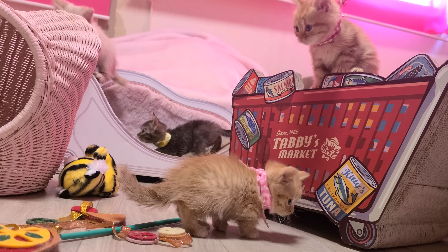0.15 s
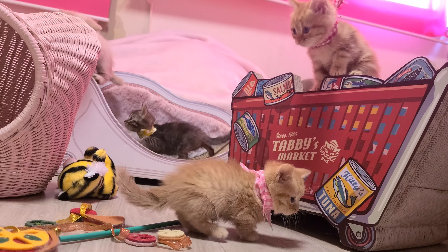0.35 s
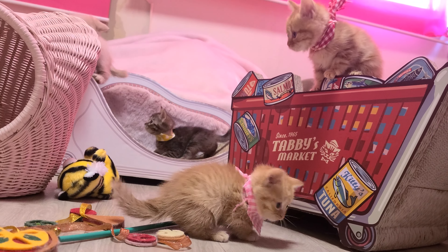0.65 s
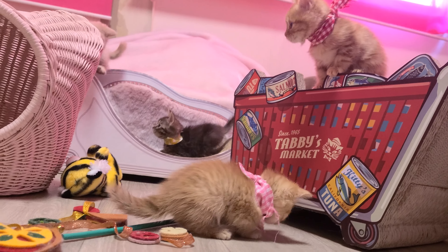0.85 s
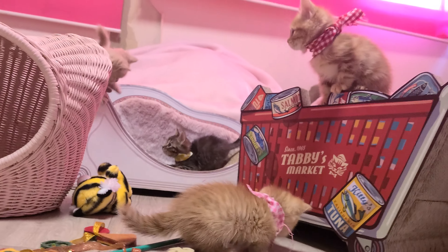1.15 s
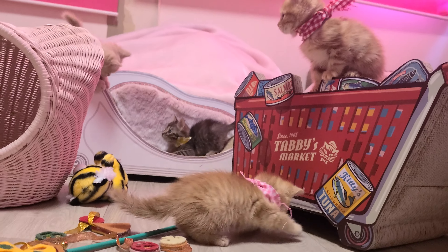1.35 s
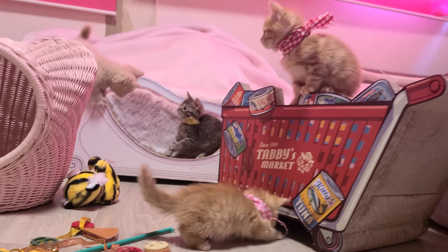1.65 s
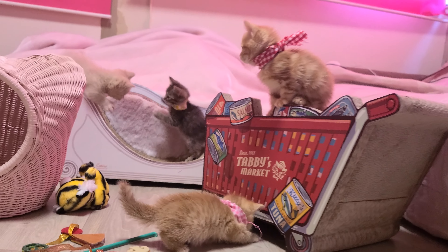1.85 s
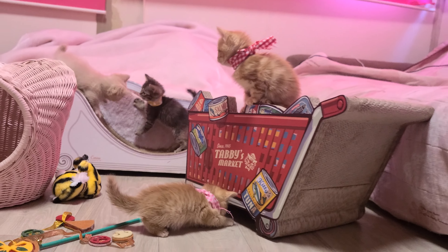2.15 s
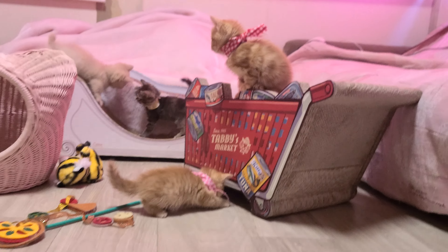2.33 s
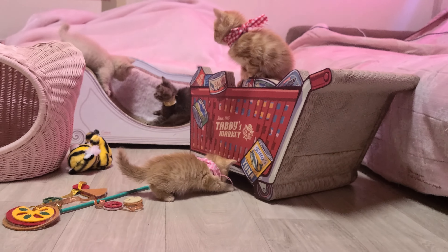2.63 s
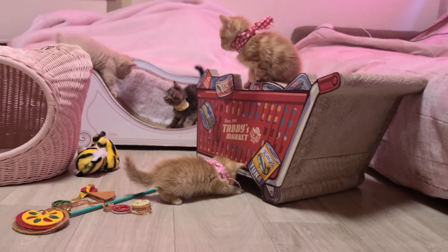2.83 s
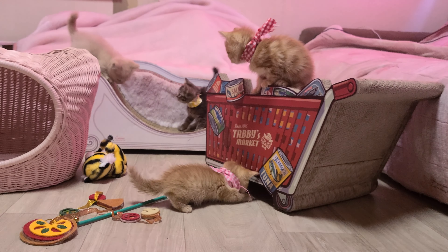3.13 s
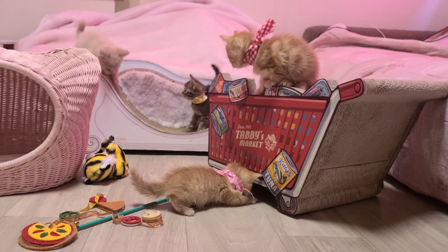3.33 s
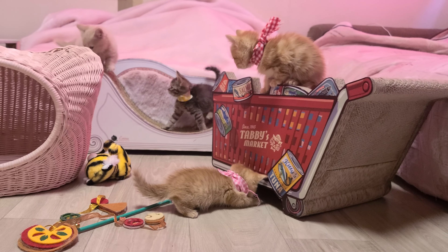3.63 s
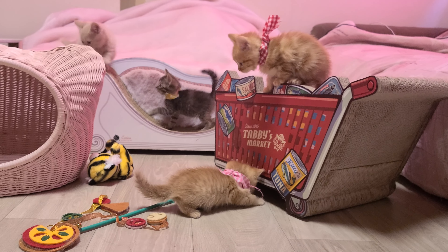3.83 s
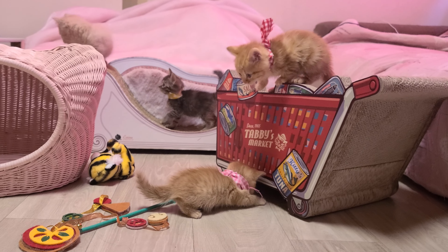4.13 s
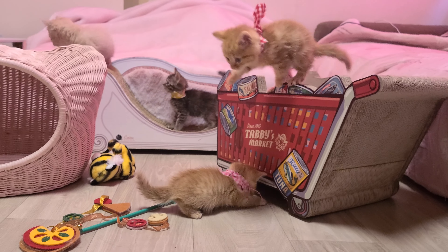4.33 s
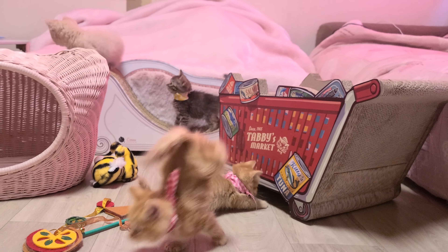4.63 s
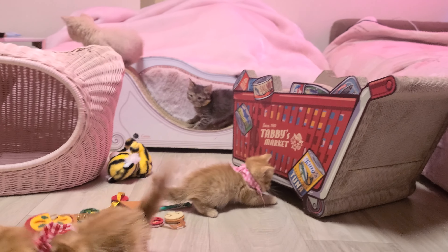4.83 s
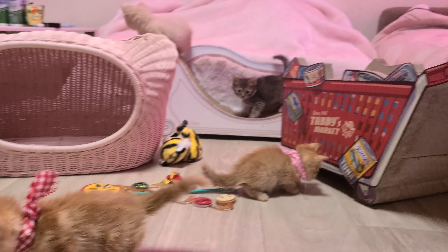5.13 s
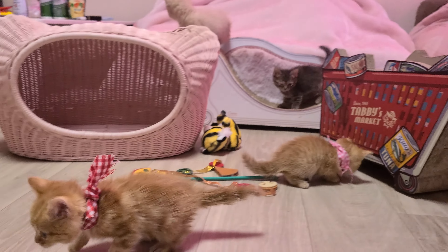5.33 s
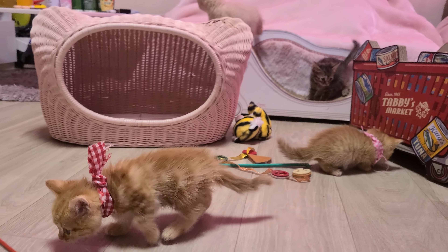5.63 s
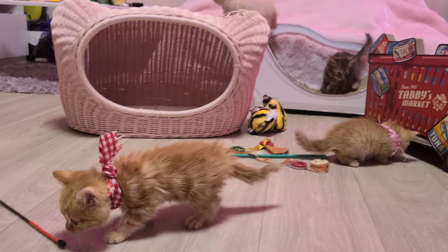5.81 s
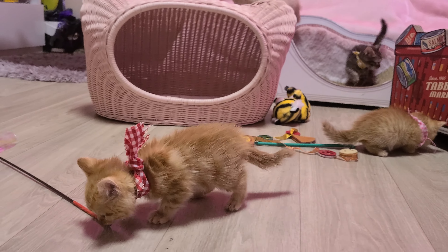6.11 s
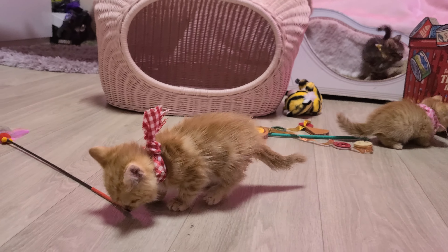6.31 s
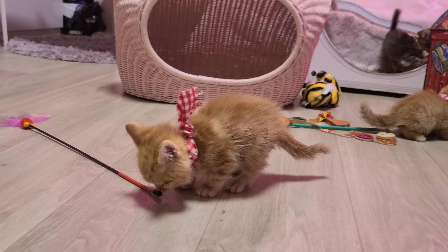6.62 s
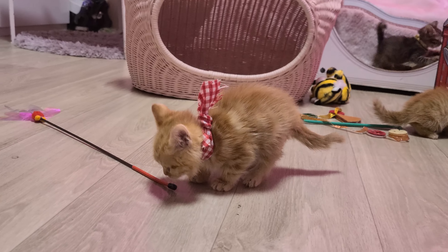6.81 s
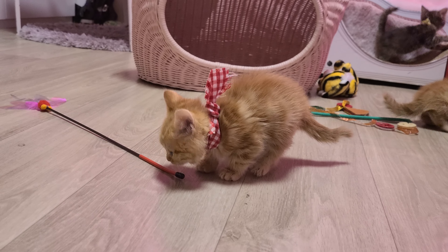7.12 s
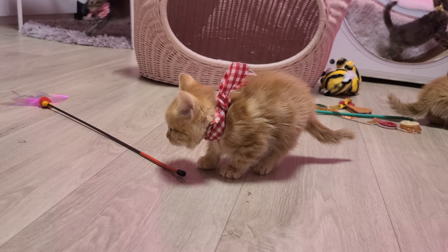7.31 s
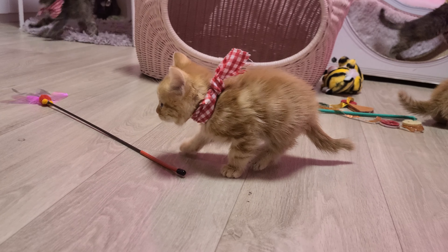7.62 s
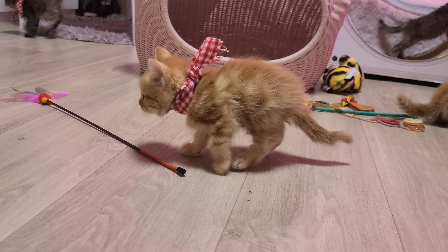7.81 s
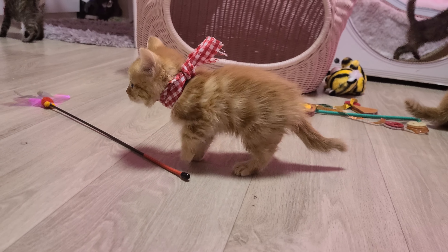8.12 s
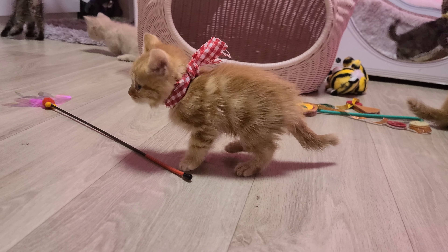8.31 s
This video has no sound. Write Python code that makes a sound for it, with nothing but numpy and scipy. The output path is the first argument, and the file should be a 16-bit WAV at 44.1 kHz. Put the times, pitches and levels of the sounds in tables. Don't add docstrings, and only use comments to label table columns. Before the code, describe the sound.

In a small furnished room a low fan hum runs throughout. Kittens' claws tick and scrape on cardboard and wicker, with faint fur rustles. Around the middle one leaps down with a soft double thud, a scuff and a tiny bell tinkle. Close finger taps pop on the right side of the handheld stereo microphone, strongest early and in a later cluster; small paw knocks end it.

```python
import sys
import numpy as np
from scipy import signal
from scipy.fft import rfft, irfft, next_fast_len
from scipy.io import wavfile
from scipy.ndimage import uniform_filter1d, map_coordinates

SR = 44100
rng = np.random.default_rng(int(sys.argv[2]) if len(sys.argv) > 2 else 0)


def pcm_store(signal):
    levels = np.round(np.clip(np.atleast_2d(signal), -1, 1) * 32767)
    wavfile.write(sys.argv[1], SR, levels.astype(np.int16).T)


def ratio(d):
    e = np.asarray(d, float) / 20
    return 10 ** e


N = 373086


def unit(x):
    return x / np.sqrt(np.mean(x ** 2) + 1e-20)


def along(points, hz):
    f, v = np.transpose(points)
    return np.interp(np.log(hz + 1), np.log(f + 1), v)


def wobble(rate):
    knots = rng.standard_normal(int(N * rate / SR) + 4)
    return map_coordinates(knots, [np.arange(N) * rate / SR])


def filtered(x, response):
    m = next_fast_len(N + SR // 2)
    return irfft(rfft(x, m) * response(np.fft.rfftfreq(m, 1 / SR)), m)[..., :N]


def resonance(centre_hz, width_hz):
    return lambda f: 1j * f * width_hz / (centre_hz ** 2 - f * f + 1j * f * width_hz)


def sides(pan_db):
    return ratio(np.array([pan_db / 2, -pan_db / 2]))


def add(track, s, sound):
    start = round(s * SR)
    track[..., start:start + sound.shape[-1]] += sound


def patchy(x, depth_db):
    z = signal.stft(x, nperseg=128)[2]
    field = uniform_filter1d(rng.standard_normal(z.shape[-2:]), size=3, axis=0)
    field = uniform_filter1d(field, size=5, axis=1)
    return signal.istft(z * unit(ratio(depth_db * unit(field))), nperseg=128)[1][..., :N]


# t/s, peak level/dB, contact/ms, port ring level/dB, vent f/Hz
FINGER_TAPS = [(1.0493, -39, 0.96, -35, 185), (1.0670, -36, 0.87, -35, 185),
               (1.0818, -35, 0.15, -26.3, 345), (1.495, -32, 0.13, -37.5, 345),
               (1.5013, -28, 0.5, -30, 300), (1.5035, -14, 0.13, 3, 420), (1.5035, -9.5, 0.4, -30, 400),
               (1.8762, -39.5, 0.85, -30, 300), (2.4432, -39, 0.44, -32.5, 300),
               (2.7124, -41, 0.1, -10, 500), (2.7129, -27, 0.7, -14, 270), (2.7270, -27.5, 0.45, -24, 290),
               (2.741, -24.5, 0.45, -16, 320), (2.7538, -27, 0.42, -21, 300),
               (3.2351, -45, 0.11, -26.3, 390), (3.2562, -11, 0.24, -21.5, 288),
               (6.0666, -6, 0.11, -9, 350), (6.2238, -31, 0.11, -30, 800), (6.2243, -5.5, 0.11, -15.5, 363),
               (6.3412, -5.5, 0.096, -11.5, 435), (6.8140, -34, 0.11, -30, 800),
               (6.8144, -5.5, 0.1, -8.5, 400), (6.9550, -34, 0.15, -30, 600),
               (6.9559, -14, 0.078, -15.5, 436), (7.0349, -33, 0.22, -30, 500),
               (7.0355, -16, 0.058, -16, 540), (7.157, -30.5, 0.12, -30, 700),
               (7.1578, -17, 0.044, -13, 560), (7.1948, -29, 0.2, -20, 560), (7.2977, -32, 0.1, -30, 700),
               (7.2981, -19, 0.053, -19, 520), (7.309, -33, 0.19, -23.9, 320),
               (7.5383, -24.5, 0.1, -14.5, 450), (7.576, -39.5, 0.11, -28, 390),
               (7.6256, -39, 0.31, -15, 270)]
# t/s, level/dB, f/Hz, swell/ms
CAVITY_PINGS = [
    (1.50314, -20.5, 3400, 0.36),
    (6.9559, -46, 3360, 0.4),
]
VENT_Q, VENT_Q_PER_MS, BASS_CUT_HZ = 1, 0.9, 35
REBOUND_HZ, REBOUND_SHARE, REBOUND_S = 250, 0.06, 0.0031
COLUMN_HZ, COLUMN_SWELL_S = 11800, 0.25e-3
CAVITY_HZ, DEAD_SPOT_HZ = 3500, 5190


def taps():
    out, t = np.zeros((2, N + SR)), np.arange(SR // 20) / SR
    for s, db, contact_ms, ring_db, vent_hz in FINGER_TAPS:
        leak = 2 * np.pi * vent_hz
        q = VENT_Q + VENT_Q_PER_MS * max(contact_ms - 0.25, 0)
        vent = signal.bilinear([1, 0, 0], [1, leak / q, leak ** 2], SR)
        step = 1 - np.cos(np.pi * np.clip(t / (1.97 * contact_ms / 1000), 0, 1))
        push = signal.lfilter(*signal.butter(1, BASS_CUT_HZ, "high", fs=SR), signal.lfilter(*vent, step))
        peak_s = t[push.argmax()]
        after = np.maximum(t - peak_s, 0)

        u = after / COLUMN_SWELL_S
        column = np.sin(2 * np.pi * COLUMN_HZ * rng.normal(1, .004) * t) * u ** 2 * np.exp(2 - u) / 4
        case = -.07 * np.sin(2 * np.pi * 175 * t) * ratio(-60 * t / 0.033)
        swell = after / REBOUND_S
        case += REBOUND_SHARE * np.cos(2 * np.pi * REBOUND_HZ * after) * swell ** 2 * np.exp(2 - 2 * swell)

        release = (t == peak_s) + 0.3 * u * np.exp(-1.5 * u) * rng.standard_normal(len(t))
        snap = 5.6 * signal.lfilter(*signal.butter(2, [6300, 13800], "band", fs=SR), release)
        brush = signal.lfilter(*signal.butter(2, 400 / contact_ms, fs=SR), rng.standard_normal(len(t)))
        brush *= np.exp(-abs(t - .006) / np.where(t < .006, .002, .004))

        seal = np.clip((db + 15) / 13, 0, 1)
        share = np.array([[1 - seal], [seal]])
        add(out, s - .006, share * ratio(db - 29) * brush)
        tap = push / push.max() + case + ratio(ring_db - 7.5) * (column + snap)
        add(out, s - peak_s, share * ratio(db) * tap)
    for s, db, hz, swell_ms in CAVITY_PINGS:
        swell = t / (swell_ms / 1000)
        add(out[0], s, ratio(db) * swell ** 2 * np.exp(2 - 2 * swell) * np.sin(2 * np.pi * hz * t))
    dead_spot = lambda f: 1 - 0.97 * resonance(DEAD_SPOT_HZ, 3200)(f)
    cavity = lambda f: 1 + 0.91 * resonance(CAVITY_HZ, 1300)(f)
    port = out[0, :N] + filtered(out[1, :N], lambda f: dead_spot(f) * cavity(f))
    return np.array([ratio(-70), 1])[:, None] * port


# t/s, peak level/dB, dull part level/dB, bright part level/dB
CLAW_TICKS = [(.7231, -54.5, 10, -2), (1.123, -40, -18, -19), (1.1504, -37, -10, -21.5),
              (1.157, -34, 3, -1), (1.1826, -40, -8, -20), (1.196, -44, -8, -20), (1.2025, -44, -12, -20),
              (1.4789, -47, 10, -11), (1.5762, -34, -10, -20.5), (1.6122, -42, -8, -18),
              (1.6589, -36, 7, -26), (1.9264, -40, -10, -15), (1.9623, -37, -27, -18),
              (2.185, -41, -23, -29), (2.33, -46, -8, -30), (2.36, -49, -8, -30), (2.425, -50, -10, -26),
              (2.452, -54, -11, -26), (2.6805, -45.5, -14.5, -26), (3.3205, -37, 5.5, -50),
              (3.441, -34, -27, -22), (4.0048, -48, -15, -18.5), (4.0283, -32, -30, -11),
              (4.455, -39, -2, -11), (4.588, -42, 10, -45), (4.5945, -42, 9, -45), (4.6934, -27, 4, -38),
              (4.7165, -36, 0, -28), (4.7205, -36, 0, -28), (4.7225, -39, 0, -28), (4.73, -47, -18, -30),
              (4.7894, -45, -2.5, -5), (6.491, -46, -20, -20), (6.4932, -44, -20, -20),
              (6.502, -44, -12, -18), (6.507, -46, -12, -18), (6.526, -42, -12, -18),
              (6.5355, -41, -12, -18), (6.542, -41, -15, -14), (6.547, -41, -15, -16),
              (7.4964, -49, 9, -20), (7.6332, -47.5, 13.5, -24), (8.2402, -49, 9, -30)]
# t/s, peak level/dB, dull part level/dB, bright part level/dB
CLAW_DRAGS = [(.8662, -57, -14, -3), (1.007, -54, -14, -10), (1.1004, -48, -3, -5), (1.1889, -37, -6, -12),
              (1.3856, -48.5, -17, -30), (1.543, -49, -8, -25.5), (1.5657, -33.5, -16, -25.5),
              (1.5832, -38, -12, -17), (1.7972, -41, -2, -30), (1.9211, -35, -30, -15),
              (3.2881, -45, -3, -30), (3.4098, -36, 1.5, -24), (3.4492, -44.5, -20, -2),
              (3.5343, -45, 0, -5), (3.6, -36.5, -7, -17), (3.7743, -50, -6, -40), (3.8197, -46.5, -1, -2),
              (3.9428, -41.5, -1.5, -35), (3.9957, -37.5, 0, -33), (4.4244, -40.5, -5, -33),
              (4.5944, -46, 3, -42), (6.4625, -52, -18, -25), (6.8625, -55, 4.5, -26),
              (7.862, -49, -8, -29.5), (8.2637, -40, -1, -17)]


def claws():
    out, t = np.zeros((3, 2, N + SR)), np.arange(SR // 5) / SR
    for table, scrape_db in ((CLAW_TICKS, -15), (CLAW_DRAGS, -8.5)):
        for s, db, dull_db, bright_db in table:
            crack = ratio(-60 * t / 0.005) * rng.standard_normal(len(t)) + 4.5 * (t == 0)
            crack *= 5.8 / np.linalg.norm(crack)
            scrape = ratio(scrape_db - 60 * t / 0.17) * rng.standard_normal((3, 2, len(t)))
            scrape *= 1 - np.exp(-t / 0.0015)
            parts = ratio([dull_db + 3, 0, bright_db + 14])[:, None, None] * sides(1.5)[:, None]
            add(out, s, ratio(db) * parts * (crack + scrape))
    return out[..., :N]


# peak t/s, level/dB, rise/s, fade/s, bright part level/dB
FUR_STROKES = [(.21, -65.5, .07, 0.22, -9), (.74, -66.5, 0.26, 0.11, -7), (1.10, -50.5, 0.032, .08, -9),
               (1.165, -47, 0.1, 0.14, -5), (1.205, -49, 0.098, 0.13, -24), (1.35, -65.5, 0.4, .3, -14),
               (1.57, -49, 0.16, 0.14, -12), (1.965, -55.5, 0.1, 0.1, -0.5), (2.27, -55.5, 0.33, 0.4, -16),
               (2.36, -64, .2, 0.11, -17.5), (2.66, -54, 0.075, 0.16, -12), (2.73, -66, .11, 0.11, -5),
               (2.97, -64, 0.12, 0.14, -10.5), (3.45, -51.5, 0.1, 0.085, -9), (3.83, -57, 0.3, 0.08, -21),
               (4.02, -53.5, 0.19, 0.19, -17), (4.48, -58.5, 0.22, 0.096, -10.5),
               (4.735, -51, 0.04, 0.1, -20), (4.82, -53, 0.2, 0.17, -6), (6.505, -50, .06, .04, -9),
               (6.54, -45.5, .07, 0.09, -8), (6.59, -58, .06, .06, -9), (7.595, -65.5, .04, 0.025, -3),
               (7.64, -65.5, 0.031, 0.11, -5)]
# t/s, level/dB, fade/s, bright part level/dB
FUR_FLICKS = [
    (.868, -59, 0.15, -10),
    (1.80, -57, 0.13, -14),
    (1.925, -55, 0.053, 6),
    (3.412, -55.5, 0.08, -1.5),
    (3.6, -63, .18, -9),
    (6.467, -56, 0.12, -3),
    (8.02, -66, 0.19, -5.5),
    (8.245, -62, 0.29, -9),
]
# peak t/s, level/dB, rise/s, fade/s, bright part level/dB
PAD_SCUFFS = [
    (2.655, -64, 0.075, .1, -25),
    (4.596, -56, 0.019, 0.12, -25),
    (4.72, -43, 0.04, 0.05, -22),
    (1.157, -51, .03, 0.027, -15),
]
FLICK_RISE_S, SWING_DB, ROUNDING = 0.0055, 27.5, 1.01


def rubbing():
    power, t = np.zeros((3, N)), np.arange(N) / SR
    flicks = [(s, db, FLICK_RISE_S, fade, bright) for s, db, fade, bright in FUR_FLICKS]
    for table, dull_db in ((FUR_STROKES + flicks, -3.5), (PAD_SCUFFS, 7.5)):
        for s, db, rise, fade, bright_db in table:
            away = abs(t - s) / np.where(t < s, rise, fade)
            parts = ratio(2 * np.array([dull_db, 0, bright_db + 10.5]))[:, None]
            power += parts * ratio(2 * (db - SWING_DB * away ** ROUNDING))
    snaps = (rng.random(N) < 220 / SR) * rng.exponential(0.7, N)
    snaps = signal.lfilter([1], [1, -.95], snaps)
    clumps = np.array([wobble(45) for part in range(3)])
    flicker = (1 + snaps) * ratio(1.2 * wobble(250) + 0.9 * clumps)
    strength = unit(flicker) * np.sqrt(power)
    return ratio(1.5) * strength[:, None] * sides(1.5)[:, None] * rng.standard_normal((3, 2, N))


# f/Hz, level/dB
LEFT_PORT = [(600, -35), (1200, 0), (2000, -3), (3000, -4.5), (4000, -12.5), (5000, -7.5), (6000, -14),
             (7000, -11), (8500, -9.5), (10000, -21.5), (12000, -19), (14000, -18), (15800, -25)]
# f/Hz, level/dB
RIGHT_PORT = [(600, -27), (1200, 2.7), (2000, -0.5), (3000, 0.5), (4000, 2.1), (5000, 8), (6000, 8.5),
              (7000, 3.5), (8500, -8.5), (10000, -4.5), (12000, -6), (14000, -16.5), (15800, -19)]


def through_ports(parts):
    above = lambda hz, edge_hz: 1 / (1 + (edge_hz / (hz + 1)) ** 8)

    def response(hz):
        bands = np.array([1 - above(hz, 3470), above(hz, 3000) - above(hz, 8070), above(hz, 5430)])
        return bands[:, None] * ratio([along(LEFT_PORT, hz), along(RIGHT_PORT, hz)])
    return filtered(parts, response).sum(axis=0)


# t/s, level/dB, f/Hz, t60/s
CELLS_AND_STRANDS = [(.8655, -48, 1500, 0.08), (.8655, -52, 1280, 0.08), (.878, -61, 10300, 0.08),
                     (1.1562, -33, 1000, 0.009), (1.156, -30, 3500, 0.012), (1.1562, -34, 4700, 0.01),
                     (1.187, -43, 1750, 0.013), (1.19, -55, 1900, 0.12), (1.0995, -47, 5600, .02),
                     (1.123, -49, 6000, 0.014), (1.1508, -34, 5600, .01), (1.56, -59.5, 2260, 0.5),
                     (3.322, -53, 3200, 0.17), (3.41, -52, 3100, 0.067), (3.411, -50.5, 4470, 0.13),
                     (3.534, -49, 2160, 0.11), (3.825, -56, 1350, 0.25), (3.819, -56, 2850, 0.22),
                     (4.455, -47.5, 3240, .1), (4.588, -37, 1810, 0.015), (4.588, -42, 3200, .012),
                     (4.594, -35, 590, 0.05), (4.6932, -33, 2130, 0.009), (4.6932, -27.5, 4700, 0.009),
                     (4.6932, -32, 3400, 0.008), (4.597, -47, 3000, .02), (4.72, -39, 2660, 0.034),
                     (4.718, -41, 3900, 0.033), (4.733, -53, 5600, 0.09), (1.187, -42, 4800, .03),
                     (3.534, -50, 5000, .03), (3.6, -49, 5300, 0.025), (3.322, -47, 4200, 0.028),
                     (3.775, -45, 5600, 0.023), (3.82, -53, 5600, .06), (4.028, -44, 4900, 0.05),
                     (3.45, -49, 6200, .04), (7.634, -56, 1600, .05), (4.716, -41, 4500, 0.054),
                     (2.655, -61, 4800, 0.084), (2.68, -55, 6000, 0.036), (2.65, -58, 2500, 0.13),
                     (4.801, -42, 1100, 0.017), (8.242, -52, 1550, 0.17), (8.274, -54.5, 1930, 0.19),
                     (.723, -58, 6300, .03), (.723, -58, 1700, .03), (.866, -55, 6640, .05),
                   (.866, -56, 5400, .05), (.878, -60, 6500, .1), (1.798, -48, 5700, .025),
                   (1.799, -53, 1300, 0.022), (1.808, -48, 5900, 0.027), (1.814, -52, 6370, .03),
                   (1.9215, -44, 4600, 0.037), (1.925, -40.5, 6400, .05), (1.938, -55, 6000, .03),
                   (1.955, -52, 3720, .06), (1.961, -41, 6440, .05), (1.964, -46, 4700, .03),
                   (1.964, -46, 3400, .03), (1.972, -49, 6500, .17), (3.411, -46.5, 3900, .04),
                   (4.456, -47, 4600, .04), (4.709, -44, 2300, 0.056), (4.727, -45, 1800, 0.045),
                   (6.464, -53, 5700, .1), (6.472, -50, 6900, .08), (6.542, -54, 11800, .14),
                   (8.264, -54.5, 4100, .08), (8.264, -51, 5200, .05), (8.279, -51, 1500, .06),
                   (8.296, -55, 1900, .06)]


def cells():
    out, t = np.zeros((2, N + SR)), np.arange(SR // 4) / SR
    for s, db, hz, t60 in CELLS_AND_STRANDS:
        body = signal.butter(1, [hz / 1.07, hz * 1.06], "band", fs=SR)
        skirt = unit(signal.lfilter(*body, rng.standard_normal((2, len(t)))))
        mode = 1.2 * np.sin(2 * np.pi * hz * t) * ratio(-60 * t / 0.02)
        envelope = (1 - np.exp(-t / 0.00047)) * ratio(db + 1.5 - 60 * t / t60)
        add(out, s, envelope * (0.75 * skirt + mode))
    return out[:, :N] * sides(-5)[:, None]


# t/s, level/dB, f/Hz
BOARD_BOOMS = [(1.081, -47, 106), (4.583, -44, 85), (4.605, -41.5, 122), (4.629, -49, 125),
               (4.660, -54, 69), (4.727, -52, 197), (4.739, -47.5, 97), (4.8, -47.5, 89), (4.818, -48, 111),
               (5.03, -54.5, 150), (5.27, -55, 126), (6.598, -49, 91.6), (8.27, -46, 45),
               (8.239, -44.5, 194), (8.248, -42.5, 102.6), (8.264, -36.5, 129), (8.276, -40, 124),
               (8.291, -42, 76), (8.305, -45.5, 165)]
# t/s, level/dB, f/Hz
BOX_KNOCKS = [(1.1555, -40, 290), (4.5878, -37, 620), (4.5942, -34.5, 590), (4.598, -41, 450),
              (4.603, -46.5, 400), (1.1562, -42, 620), (4.727, -40, 291), (4.801, -36.5, 440),
              (4.6932, -41, 470), (8.2405, -34, 950), (8.244, -35.5, 400), (8.249, -41, 380),
              (8.264, -45, 910), (8.276, -33.5, 330), (8.286, -39, 600), (8.290, -46, 1010),
              (8.305, -60, 500)]
KNOCK_T60_S, KNOCK_DAMPING = 0.047, 0.94


def paws():
    out, t = np.zeros(N + SR), np.arange(SR // 4) / SR
    for s, db, hz in BOARD_BOOMS:
        swell = (t / 0.005) ** 2 * np.exp(2 - t / 0.0063) / 4
        add(out, s, ratio(db) * np.sin(2 * np.pi * hz * t) * swell)
    for s, db, hz in BOX_KNOCKS:
        body = signal.butter(1, [hz / 1.7, hz * 1.7], "band", fs=SR)
        noise = signal.lfilter(*body, signal.lfilter(*body, rng.standard_normal(len(t))))
        knock = 0.6 * unit(noise) - 1.1 * np.sin(2 * np.pi * hz * t)
        decay_db = -60 * t / KNOCK_T60_S * (hz / 500) ** KNOCK_DAMPING
        add(out, s, ratio(db - 1.5 + decay_db) * knock)
    return out[:N]


# f/Hz, level/dB, t60/s
BELL_MODES = [
    (7240, -5, .065),
    (7870, -2, .04),
]
# t/s, level/dB
PEA_BLOWS = [
    (4.778, -54),
    (4.787, -35.5),
    (4.80, -45),
    (4.82, -49),
    (4.835, -53),
    (4.85, -54),
    (4.862, -62),
]


def bell():
    out, t = np.zeros(N + SR), np.arange(SR // 3) / SR
    for s, blow_db in PEA_BLOWS:
        for hz, db, t60 in BELL_MODES:
            ring = np.sin(2 * np.pi * hz * rng.normal(1, 0.003) * t) * (1 - np.exp(-t / 0.001))
            add(out, s, ratio(blow_db + db + 1 + rng.normal(0, 1.5) - 60 * t / t60) * ring)
    return out[:N] * ratio(2.5 * wobble(110))


def walls(x, t60):
    t = np.arange(SR // 3) / SR
    tail = rng.standard_normal((2, len(t))) * ratio(-60 * t / t60)
    return signal.fftconvolve(x[None], tail / np.linalg.norm(tail[0]), axes=1)[:, :N]


def pair(alike):
    turn = lambda hz: np.arccos(np.clip(along(alike, hz), -1, 1)) / 2
    weights = lambda hz: np.array([np.cos(turn(hz)), np.sin(turn(hz))])
    mid, side = filtered(rng.standard_normal((2, N)), weights)
    return np.array([mid + side, mid - side])


# f/Hz, level/dB
LEFT_AIR = [(25, -1), (50, 14), (130, 3.5), (300, 2), (850, -6.5), (1200, -8.5), (2500, -13), (4300, -25.5),
            (5300, -26), (6700, -9), (7600, -19), (9300, -46.5), (13500, -34.5), (15800, -37.5)]
# f/Hz, level/dB
RIGHT_AIR = [(25, 1), (50, 12.5), (130, 8), (300, 4), (850, -5.5), (1200, -7.5), (1650, -7.5),
             (2300, -13.5), (6200, -13.5), (7200, -15.5), (8800, -31), (12000, -26), (13500, -26),
             (15800, -36)]
# f/Hz, left-right likeness
COHERENCE = [
    (60, 0.94),
    (180, 0.93),
    (550, 0.78),
    (1650, 0.077),
    (4970, 0.25),
    (15000, 0.53),
]
# f/Hz, width/Hz, level/dB, steady share
ROOM_MODES = [
    (46, 8.6, -67, 0.8),
    (86.25, 4.374, -57.5, 0.91),
    (127, 8, -80.5, 0.294),
    (181.86, 9.28, -61.5, 0.9),
    (275, 7.9, -82.5, 0.284),
]
# t/s, aim 0-1
CAMERA_AIM = [
    (0, 0.03),
    (1.1, 0),
    (2, 0.54),
    (3, 0.76),
    (4, 0.73),
    (5, 1),
    (6, 0.8),
    (7, 0.42),
    (8, 0.54),
    (8.46, 0.6),
]


def room_air():
    times, aims = np.transpose(CAMERA_AIM)
    aim = np.clip(np.interp(np.arange(N) / SR, times, aims), 0, 1)
    colour = lambda hz: ratio([along(LEFT_AIR, hz), along(RIGHT_AIR, hz)])
    bed = filtered(patchy(pair(COHERENCE), depth_db=1.0), colour)
    treble = filtered(bed, lambda hz: hz > 2000)
    hiss = ratio(-2.5 + 3.5 * aim + 0.41 * wobble(5.8))
    air = ratio(-59.5) * (bed + (hiss - 1) * treble) / np.std(bed)

    for hz, width, db, steady in ROOM_MODES:
        drone = np.sin(2 * np.pi * np.cumsum(hz + width / 5 * wobble(6)) / SR)
        rumble = unit(filtered(pair([(100, 0.84)]), lambda f: resonance(hz, 2 * width)(f) ** 2))
        air += ratio(db) * (steady * drone + (1.15 - steady) * rumble)

    low = lambda f: resonance(350, 300)(f) ** 2
    middle = lambda f: ((resonance(600, 500)(f) + 0.92 * resonance(880, 250)(f)) ** 2
                        / (1 + (f / 1000) ** 10))
    high = lambda f: resonance(1400, 900)(f) ** 2 / (1 + (f / 1800) ** 10)
    for share, db, rate, band in ((1 - aim, -63.5, 1.5, low), (aim, -63, 19, middle), (aim, -70.5, 13, high)):
        air += share * ratio(db + wobble(rate)) * unit(filtered(pair(COHERENCE), band))
    return air * sides(0.03)[:, None]


def right_late(x, samples):
    return np.array([x[0], np.roll(x[1], samples)])


def scene():
    landing, tinkle = paws(), bell()
    near = patchy(through_ports(ratio(-3.5) * claws() + rubbing()), depth_db=2.0) + cells()
    thuds = landing * sides(-0.47)[:, None] + ratio(-12.5) * walls(landing, t60=0.3)
    jingle = tinkle * sides(-2.3)[:, None] + ratio(3) * walls(tinkle, t60=0.07)
    return right_late(room_air() + near + thuds + jingle, samples=8) + taps()


def band_limit(x):
    return signal.sosfilt(signal.butter(12, 16810, fs=SR, output="sos"), x)


def record(dry):
    mix = filtered(dry, lambda hz: np.where(hz < 15900, 1, ratio(-19) * (hz < 16800)))
    return band_limit(mix)


dry = scene()
out = record(dry)
pcm_store(out)
```